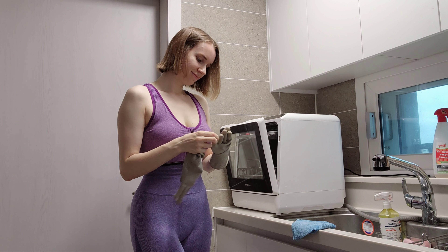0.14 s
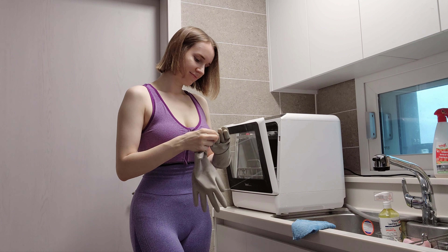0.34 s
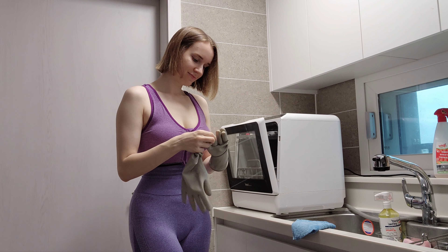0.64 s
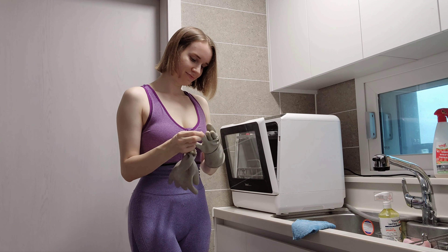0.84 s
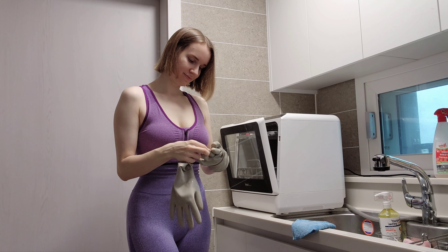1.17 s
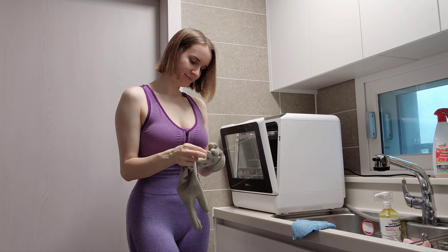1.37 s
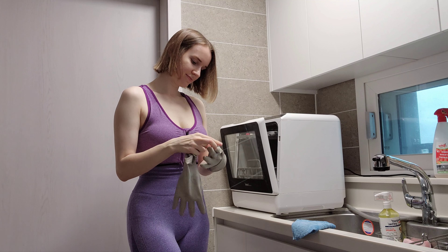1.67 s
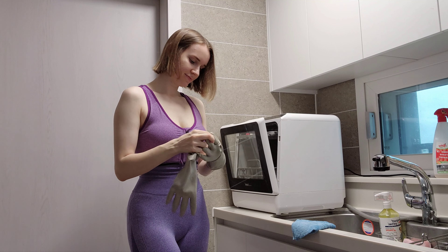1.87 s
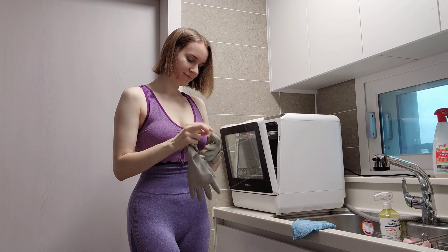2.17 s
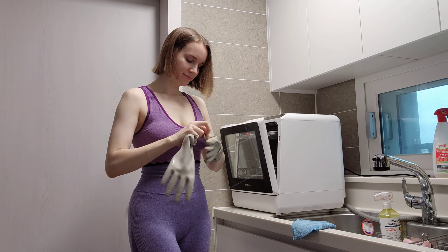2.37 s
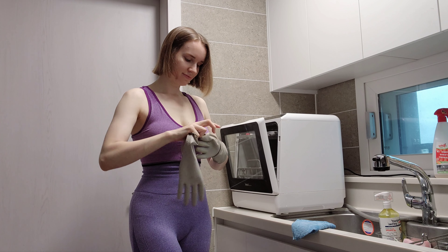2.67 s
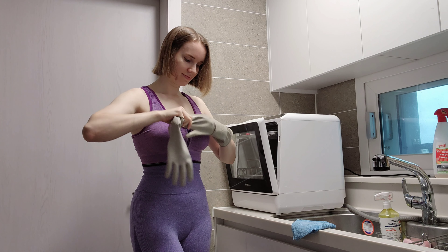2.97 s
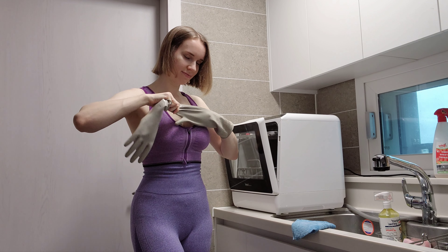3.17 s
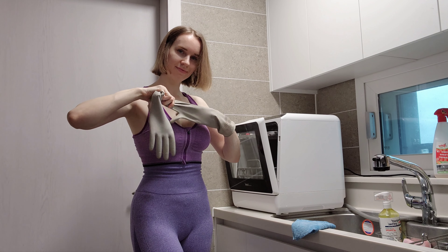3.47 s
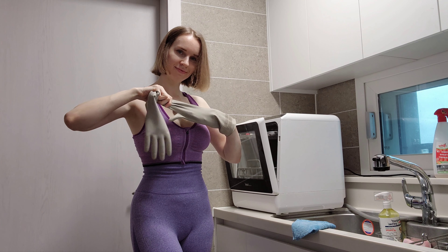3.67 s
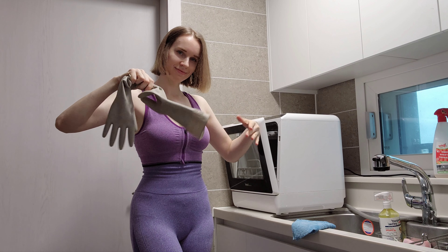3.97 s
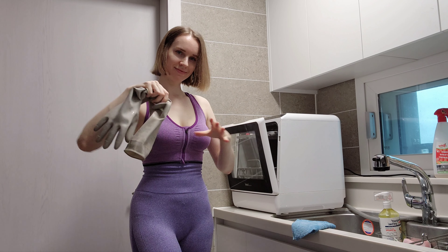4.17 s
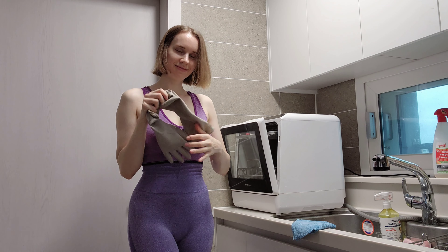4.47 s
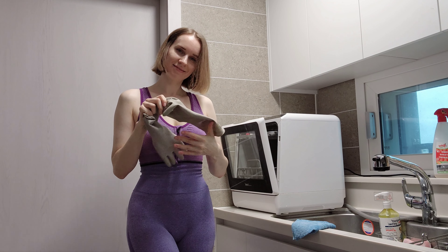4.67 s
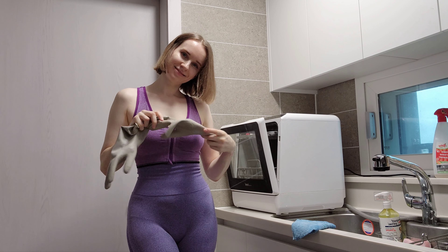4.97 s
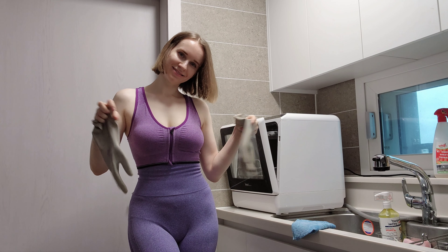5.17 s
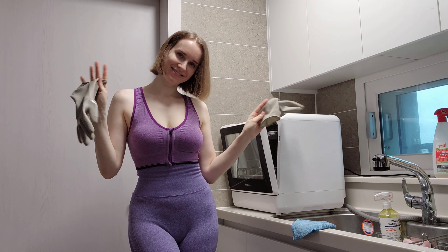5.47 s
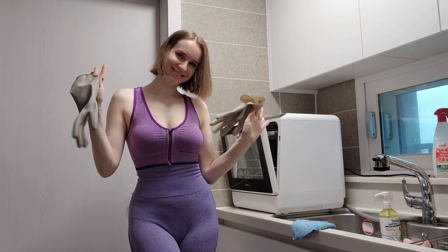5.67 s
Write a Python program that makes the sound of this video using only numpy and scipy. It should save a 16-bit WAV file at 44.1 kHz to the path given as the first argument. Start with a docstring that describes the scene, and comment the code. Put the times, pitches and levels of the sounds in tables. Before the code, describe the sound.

Soft rubbery rustling, quick scrapes and two sharper snaps as gloves come off, then light crackling, above a constant low drone.

```python
"""A low appliance hum holds throughout while someone tugs a rubber glove off finger by finger in a tiled kitchen.
Noise grains rustle with the fingers' effort; from the start, rasps slide off the skin and fingertips flick back.
Then come bright ticks, half-squeaks of rubber on rubber and hollow pops: shaped grains through filters.
From 4.1 s the folds crackle at random; then the limp glove hisses more.
Random taps add a short, bright echo from the hard walls."""
import sys
import numpy as np
from scipy import signal
from scipy.fft import irfft
from scipy.io import wavfile
from scipy.ndimage import uniform_filter1d

SR = 44100
rng = np.random.default_rng(int(sys.argv[2]) if len(sys.argv) > 2 else 0)


def persist_wave(psi):
    """Save psi, clipped to +-1, as 16-bit WAV."""
    counts = np.round(np.clip(psi, -1, 1) * 32767).astype(np.int16)
    wavfile.write(sys.argv[1], SR, np.atleast_2d(counts).T)


N = 257535

# Colour of rubber rubbing on skin. Each row: frequency in Hz, relative level in dB per Hz.
RUBBER_COLOUR = [(100, -46), (200, 7), (400, -2), (650, -6.5), (950, 0), (1250, -3.5), (1600, -8),
                 (2100, -9), (2700, -13.5), (3500, -12.5), (4300, -14.5), (5400, -18), (7800, -22.5),
                 (9000, -31.5), (15500, -35)]
# How hard the fingers work the rubber. Each row: time in seconds, effort in dB.
FINGER_EFFORT = [(0.25, -71), (0.4, -92.5), (0.7, -69), (0.84, -68.5), (1.25, -78.5), (1.46, -68.5),
                 (1.63, -89), (1.9, -61.5), (2.1, -66), (2.3, -75), (2.4, -66.5), (2.65, -66), (2.76, -72),
                 (2.93, -75), (3.08, -90), (3.22, -74.5), (3.55, -69.5), (3.9, -72.5), (4.06, -65.5),
                 (4.2, -66), (4.65, -73.5), (4.86, -70), (5.02, -67), (5.5, -71.5), (5.65, -66),
                 (5.84, -64)]
SCRAPE_DB = 2.0  # rms unevenness: rubber grips and slides by turns
POP_NOOK_SHARE = 0.65  # how much of the nook a pop takes on


def gain_of(db):
    """Decibels to a factor."""
    return 10 ** (np.asarray(db) / 20)


def evened(x):
    """Scales to rms 1."""
    return x / np.sqrt(np.mean(x ** 2) + 1e-30)


def read(points, hz):
    """Reads a table on a log-frequency axis."""
    f, value = np.transpose(points)
    return np.interp(np.log(hz + 1), np.log(f + 1), value)


def add(mix, start_s, sound):
    """Adds a stereo sound at start_s, cut to the length of the mix."""
    start = round(start_s * SR)
    sound = sound[:, max(-start, 0):]
    part = mix[:, max(start, 0):][:, :sound.shape[1]]
    part += sound[:, :part.shape[1]]


def waver(count, size):
    """Smooth chance of rms 1 that changes over about size samples."""
    return evened(signal.oaconvolve(rng.standard_normal(count), signal.windows.hann(size), "same"))


def grains(count, per_s, spread_db, smooth):
    """Stick-slip: tiny clicks of uneven size over smooth friction noise."""
    size = gain_of(spread_db * np.minimum(rng.exponential(1, count), 4))
    sign = rng.choice([-1, 1], count)
    clicks = size * sign * (rng.random(count) < per_s / SR)
    return evened(clicks) + smooth * rng.standard_normal(count)


def coloured(x, curve, size=8192):
    """Causal minimum-phase filter whose gain in dB is curve(Hz), floored at -100 dB."""
    f = abs(np.fft.fftfreq(size, 1 / SR))
    log_gain = np.log(gain_of(np.maximum(curve(f), -100)))
    spectrum = np.exp(np.conj(signal.hilbert(log_gain)))
    taps = np.fft.ifft(spectrum).real[:size // 2]
    return signal.fftconvolve(x, taps)[:len(x)]


def above(f, hz):
    """Smooth step from 0 to 1 around hz."""
    return f ** 4 / (f ** 4 + hz ** 4)


def peak(f, hz, width_hz):
    """Gain in dB of one resonance."""
    return -10 * np.log10(1 + ((f ** 2 - hz ** 2) / ((f + 1) * width_hz)) ** 2)


def resonate(x, hz, width_hz):
    """A steep resonance, two equal poles, that follows the pitch hz."""
    turn = np.exp(2j * np.pi * np.cumsum(hz) / SR)
    r = np.exp(-np.pi * width_hz / SR)
    return (turn * signal.lfilter([(1 - r) ** 2], [1, -2 * r, r * r], x / turn)).real


def nook(f):
    """Gain in dB of the narrow resonances between counter and cupboards."""
    # Each row: frequency in Hz, width in Hz, boost in dB at full share.
    nook_modes = [(435.5, 25, 7.5), (546, 22, 8.5), (623, 19, 10.5), (739, 18, 7.5), (903, 19, 4.5),
                  (1002, 22, 6), (1100, 40, 4), (1299, 67, 11), (1700, 24, 4), (2080, 52, 3)]
    return sum(db / (1 + (2 * (f - hz) / width_hz) ** 2) for hz, width_hz, db in nook_modes)


def kitchen(x, right_db=1.3, wet_db=-2.0, early_db=5.5, early_s=0.013, gap_s=0.0008, mono_hz=380, size=16384):
    """Direct sound, a little earlier on the left, then close reflections and a short tail."""
    # Reverberation. Each row: frequency in Hz, time to fall 60 dB in seconds.
    room_t60 = [(150, 0.61), (500, 0.41), (1000, 0.31), (2000, 0.38), (4000, 0.33), (8000, 0.29),
                (15000, 0.14)]
    taps = rng.choice([-1., 1.], (2, size)) * (rng.random((2, size)) < 0.15)
    hz, frame_s, z = signal.stft(taps, SR, nperseg=256)
    decay = gain_of(-60 * frame_s / read(room_t60, hz)[:, None])
    tail = signal.istft(z * decay, SR, nperseg=256)[1][:, :size]
    t = np.arange(size) / SR
    early = rng.standard_normal((2, size)) * (rng.random((2, size)) < 0.025) * np.exp(-t / early_s)
    echo = gain_of(wet_db) * evened(tail) + gain_of(early_db) * evened(early)
    echo = echo * (t > gap_s) / np.sqrt(size)
    # long waves reach both sides alike
    side = signal.lfilter(*signal.butter(1, mono_hz, "high", fs=SR), echo[1])
    response = np.array([echo[0] + side, echo[0] - side]) / np.sqrt(2)
    response[[0, 1], [0, 2]] += 1  # direct sound: right two samples later
    return signal.fftconvolve(x[None], response, axes=1) * gain_of([[-right_db / 2], [right_db / 2]])


def at_level(x, db, size=400):
    """Scales a sound so that the loudest moment of its mono mean has the level db."""
    return gain_of(db) * x / np.sqrt(uniform_filter1d(x.mean(0) ** 2, size).max())


def steady(curve):
    """Stereo noise with the spectrum curve(Hz), nearly mono in the bass."""
    # Each row: frequency in Hz, left-right likeness from 0 to 1.
    likeness = [(60, 1), (150, 0.97), (300, 0.8), (700, 0.053), (2000, 0.082), (12000, 0.18)]
    f = np.fft.rfftfreq(N, 1 / SR)
    left, other = np.exp(2j * np.pi * rng.random((2, len(f))))
    same = np.clip(read(likeness, f), -1, 1)
    right = same * left + np.sqrt(1 - same ** 2) * other
    return evened(irfft(np.array([left, right]) * gain_of(curve(f)), N))


def hum():
    """A low drone of even strength whose close tones beat, with faint wavering whines and moving air."""
    drone_db, air_db = -45.0, -57.5
    # Appliance drone. Each row: frequency in Hz, relative level in dB per Hz.
    drone_curve = [(15, -38), (38, -24.5), (47, -7), (56, -3), (63, -4), (72, 9), (81, 0.5), (90, 9),
                   (98, -5), (108, 7.5), (118, -13.5), (145, -40.5), (250, -61.5), (600, -110)]
    # Moving air in the room. Each row: frequency in Hz, relative level in dB per Hz.
    air_curve = [(60, -10), (130, 0), (220, -5.5), (300, -14), (400, -26), (600, -30), (900, -26),
                 (1300, -36), (2000, -42), (3200, -45), (5000, -53), (7500, -56), (9500, -64), (15500, -62)]
    # Faint tones. Each row: frequency in Hz, width in Hz of one of two equal stages, level in dB.
    whine_bands = [(226, 24, -73), (880, 98, -81), (6450, 70, -95.5)]
    drone = steady(lambda f: read(drone_curve, f))
    drone = drone / np.sqrt(uniform_filter1d(drone[0] ** 2, size=9000))
    air = steady(lambda f: read(air_curve, f))
    whines = sum(gain_of(db) * steady(lambda f: 2 * peak(f, hz, width_hz))
                 for hz, width_hz, db in whine_bands)
    return gain_of(drone_db) * drone + gain_of(air_db) * air + whines


def creases(flurry_db=3, count=10):
    """Creases of many sizes: each rubs softly in its own band and in its own little flurries."""
    edges_hz, out = np.geomspace(350, 15500, count + 1), 0
    for band in zip(edges_hz, edges_hz[1:]):
        flurries = gain_of(flurry_db * np.clip(waver(N, size=3000), -2, 1.7))
        crinkles = grains(N, 500, 1.6, 0.7) * flurries
        out = out + signal.sosfilt(signal.butter(2, band, "band", fs=SR, output="sos"), crinkles)
    return out


def rustle(bright_db=6, rub_hz=1050, rub_width_hz=850, nook_share=0.16):
    """Soft, grainy rubbing that follows the fingers' effort: a dull, hollow part and a dry hiss."""
    rub_db, hiss_db = -3, -6  # relative to the effort
    # once off the hand, the limp rubber brushes itself and hisses more
    loose_s, loose_rise_s, loose_hiss_db = 4.57, 2.2, 7.5
    t, friction = np.arange(N) / SR, creases()
    effort_db = np.interp(t, *np.transpose(FINGER_EFFORT))
    loose = np.clip((t - loose_s) / loose_rise_s, 0, 1)
    dull = coloured(friction, lambda f: peak(f, rub_hz, rub_width_hz) + nook_share * nook(f)
                    - 20 * above(f, 5700))
    dry_hiss = coloured(friction, lambda f: read(RUBBER_COLOUR, f) - 25 * (1 - above(f, 1120))
                        + bright_db * above(f, 12000))
    scrapes_db = SCRAPE_DB * (loose > 0) * waver(N, size=1200)
    hiss_gain = gain_of(hiss_db + loose_hiss_db * loose + scrapes_db)
    sound = gain_of(effort_db) * (gain_of(rub_db) * evened(dull) + hiss_gain * evened(dry_hiss))
    return evened(kitchen(sound)[:, :N]) * sound.std()


def slip(peak_s, db, swell_s, fade_s, thump_db, sizzle_db, top_db, right_db=1.0, count=20000):
    """A patch of rubber lets go: crinkles and friction swell to a peak and die away in uneven scrapes."""
    thump_hz, sizzle_hz, top_hz = 850, 2570, 8500  # thump below, sizzle above, air above
    t = np.arange(count) / SR - 0.2
    crinkles = grains(count, 1100, 2.5, 0.45) * gain_of(SCRAPE_DB * waver(count, size=600))
    rasp = crinkles * np.exp(np.where(t < 0, -(t / swell_s) ** 2, -t / fade_s))
    sound = coloured(rasp, lambda f: read(RUBBER_COLOUR, f) + nook(f)
                     + thump_db * (1 - above(f, thump_hz))
                     + sizzle_db * above(f, sizzle_hz)
                     + top_db * above(f, top_hz))
    return peak_s + t[0], at_level(kitchen(sound, right_db), db)


def flick(s, db, hz, rise_s, fade_s, crack_db, right_db, sag=0.18, sag_s=0.045, flutter_db=2, crack_s=0.007,
          count=8000):
    """A taut fingertip springs back: a soft crack, then fluttering modes that sink as the rubber slackens."""
    # Each row: share of the highest pitch, width as a share of it, level in dB.
    modes = [(0.63, 0.36, -8), (0.78, 0.092, -1), (0.91, 0.11, 0), (1.0, 0.052, -6.5)]
    t = np.arange(count) / SR
    rise = (1 - np.exp(-t / rise_s)) ** 2
    push = grains(count, 1500, 5.1, 1.0) * gain_of(flutter_db * waver(count, size=300)) * rise
    pitch = hz * (1 - sag * (1 - np.exp(-t / sag_s)) + 0.011 * waver(count, size=500))
    fading = push * np.exp(-t / fade_s)
    ring = sum(gain_of(mode_db) * evened(resonate(fading, share * pitch, width * hz))
               for share, width, mode_db in modes)
    crack = coloured(push * np.exp(-t / crack_s), lambda f: read(RUBBER_COLOUR, f)
                     - 8 * (1 - above(f, 700)) - 5 * above(f, 2500) - 6 * above(f, 7000))
    sound = evened(ring) + gain_of(crack_db) * evened(crack)
    return s - rise_s, at_level(kitchen(sound, right_db), db)


def tick(s, db, hz, width_share, fade_s, early_db, count=4000):
    """Tacky rubber lets go: a very short, bright snap of noise through one resonance."""
    u = np.arange(count) / SR / fade_s
    snap = rng.standard_normal(count) * u * np.exp(-u)
    sound = coloured(snap, lambda f: peak(f, hz, width_share * hz))
    return s - fade_s, at_level(kitchen(sound, early_db=early_db), db)


def rub(peak_s, db, hz, width_share, swell_s, fade_s, right_db, glide_per_s=-0.9, scrape_db=-13,
        nook_share=0.33, count=14000):
    """Friction swells and fades in one pocket of the glove, whose pitch slides as it changes shape."""
    t = np.arange(count) / SR - 0.12
    drag = grains(count, 830, 3.3, 0.68) * np.exp(np.where(t < 0, t / swell_s, -t / fade_s))
    pitch = hz * (1 + glide_per_s * t)
    note = coloured(resonate(drag, pitch, width_share * hz), lambda f: nook_share * nook(f))
    scrape = coloured(drag, lambda f: read(RUBBER_COLOUR, f))
    sound = evened(note) + gain_of(scrape_db) * evened(scrape)
    return peak_s + t[0], at_level(kitchen(sound, right_db), db)


def pop(s, db, hz, width_share, fade_s, crack_db, right_db, rise_s=0.002018, count=8000):
    """A fold flips over: a crack from the sheet and a damped, unsteady note from the pocket of air."""
    t = np.arange(count) / SR
    envelope = np.exp(-t / fade_s) * (1 - np.exp(-t / rise_s)) ** 2
    push = grains(count, 2000, 0.63, 0.89) * envelope
    pitch = hz * (1 + 0.039 * width_share * waver(count, size=400))
    note = coloured(resonate(push, pitch, width_share * hz),
                    lambda f: POP_NOOK_SHARE * nook(f) - 20 * (1 - above(f, 196)))
    crack = coloured(push, lambda f: read(RUBBER_COLOUR, f) + POP_NOOK_SHARE * nook(f)
                     - 7 * above(f, 6000))
    sound = evened(note) + gain_of(crack_db) * evened(crack)
    return s - rise_s, at_level(kitchen(sound, right_db), db)


def crumple(fade_s=0.003, width_share=0.16, count=800):
    """The folds of the emptying glove give way at random in tiny crackles, each size at its own pitch."""
    from_s, level_db, per_s = 4.1, -2.5, 11  # start, level against the effort, rate of each fold
    # Pitch of each fold in Hz, large to small.
    folds_hz = [1300, 2130, 3160, 5000]
    t = np.arange(N) / SR
    burst, out = np.exp(-np.arange(count) / SR / fade_s), 0
    for hz in folds_hz:
        gives = rng.uniform(0.3, 1, N) * (rng.random(N) < per_s / SR)
        crackle = signal.oaconvolve(gives, burst)[:N] * rng.standard_normal(N)
        fold = coloured(crackle, lambda f: peak(f, hz, width_share * hz) - 16 * above(f, 8000))
        out = out + evened(fold)
    effort_db = np.interp(t, *np.transpose(FINGER_EFFORT))
    return evened(kitchen(out)[:, :N]) * gain_of(effort_db + level_db) * (t > from_s)


def scene():
    """The glove over the hum."""
    # Rubber sliding off the skin. Each row: peak time in seconds, level in dB, swell and fade in seconds,
    # low thump, high sizzle and topmost air in dB.
    slips = [(0.006, -47.5, 0.075, .02, -24.5, -1, 2), (0.227, -75.5, 0.031, 0.018, -14, 26, -2),
             (0.333, -67, 0.027, 0.038, 0, 11, -4), (0.717, -62, 0.0066, 0.046, -1, 8.5, -5),
             (0.753, -50, 0.013, 0.021, -2.5, 4.5, 3), (0.776, -53.5, 0.006, .011, -12, 14.5, -2),
             (0.80, -53.5, 0.0065, 0.018, -19, 3.5, -10), (1.32, -52, 0.0051, .012, -4.5, 10, 4),
             (1.332, -46.5, 0.0079, 0.02, -4.5, 8.5, -0.5), (1.39, -65, .02, 0.057, -14, 14, -18),
             (1.955, -36, 0.01, 0.014, -4.5, -1, 3.5), (1.995, -47, 0.048, 0.0056, -13, -4, -3),
             (2.353, -56.5, 0.016, 0.0088, -7, -2, 7), (2.58, -55, 0.024, .033, -19, 1.5, -2),
             (2.61, -57, 0.0089, 0.013, -2, -2, -1), (2.671, -57.5, .03, 0.017, -42, -3, -14),
             (2.823, -63.5, 0.046, 0.05, 8.5, 8, -7), (2.984, -61, 0.023, 0.075, -0.5, 7.5, 0),
             (3.023, -53, 0.0057, 0.021, -1, -3, 10), (3.445, -54, 0.0061, 0.013, 1, -1.5, 8.5),
             (3.762, -45, 0.0035, 0.026, -14, -1, -7), (3.79, -43, 0.007, 0.015, -14, 7.5, 6.5),
             (3.81, -39, 0.014, .024, -5.5, 7, -0.5), (3.85, -43, 0.05, 0.029, 0.5, -13, 7),
             (4.113, -62, .011, .014, -2, 8, -5), (4.131, -60.5, .008, 0.0066, 2, 9, -10),
             (4.201, -54, 0.028, 0.028, 5.5, 6, -17), (4.329, -58.5, .008, 0.026, 3, 6, -28),
             (4.464, -58.5, 0.0054, .012, 1, 1.5, 11), (4.481, -54, 0.008, 0.021, -2, 5.5, 7),
             (4.526, -55.5, 0.0045, 0.36, 24, 23.5, -3), (4.745, -65, 0.1, .16, 5, -2, 11),
             (4.933, -51, 0.022, 0.042, -6.5, 5.5, 0), (5.161, -59.5, 0.014, 0.025, -14, 4, 4),
             (5.193, -57.5, 0.019, 0.014, 11, 13, 0), (5.326, -61, 0.078, 0.058, 11.5, 22, 2),
             (5.652, -57.5, 0.019, 0.0093, 7, 16, -18), (5.804, -56.5, 0.076, 0.072, 21, -13, -4)]
    # Stretched fingertips flicking back. Each row: time in seconds, level in dB, highest pitch in Hz,
    # rise and fade in seconds, crack in dB, right minus left in dB.
    flicks = [(0.122, -55, 2150, .004, 0.016, -3.5, 0.5), (0.998, -54.5, 1916, 0.0022, 0.033, -1.5, 1.5),
              (1.543, -43, 2212, 0.0018, 0.016, -9.5, 1), (2.178, -53, 2006, 0.0043, 0.038, -2, 2),
              (4.606, -61, 2246, 0.0046, 0.023, -10, 3), (5.761, -51, 2300, .003, 0.0066, 1.5, -1)]
    # Tacky rubber letting go. Each row: time in seconds, level in dB, centre in Hz, width as a share of it,
    # fade in seconds, close reflections in dB.
    ticks = [(0.714, -82, 3320, .15, 0.0014, 4), (0.928, -69.5, 5140, 0.11, 0.0048, -7),
             (1.006, -74, 4500, 0.052, 0.0044, 8), (1.274, -61, 5200, 0.21, 0.0025, -15),
             (1.544, -54, 3700, 0.18, .0012, -24), (3.303, -70.5, 6300, 0.24, .0015, 7),
             (4.13, -74, 3480, 0.11, 0.0012, 6), (4.399, -68, 3650, 0.24, 0.0016, -2),
             (4.527, -67, 4940, 0.085, 0.0014, 2), (4.928, -64, 9500, 0.33, 0.0016, 1),
             (4.938, -56, 2800, 0.18, 0.0017, 6), (5.058, -66.5, 5500, 0.32, 0.0035, -7),
             (5.349, -73, 9000, 0.91, 0.00037, 10), (5.633, -53, 5300, 0.92, 0.00034, -9),
             (5.713, -59.5, 5240, 0.18, .001, 3), (5.832, -69, 5530, 0.43, .0006, -6)]
    # Rubber dragging on rubber. Each row: peak time in seconds, level in dB, pitch in Hz at the peak,
    # width as a share of it, swell and fade in seconds, right minus left in dB.
    rubs = [(1.291, -64.5, 1160, 0.3, 0.0092, 0.011, 5), (1.45, -68, 2000, 0.37, 0.0084, .02, 3),
            (1.538, -51.5, 947, 0.083, 0.013, 0.004, 4.5), (1.861, -75, 1370, 0.096, 0.013, 0.009, 6),
            (1.897, -65, 1280, 0.089, 0.0091, 0.026, 13), (2.398, -62.5, 1280, 0.11, 0.0044, 0.022, 8),
            (2.435, -71, 1250, 0.28, .008, 0.049, 7), (2.637, -58, 1290, 0.1, 0.005, 0.016, 4),
            (2.672, -49.5, 1353, 0.068, 0.013, 0.0032, 2), (2.784, -68.5, 1090, 0.14, 0.017, .012, 7),
            (2.83, -64.5, 878, 0.064, 0.025, 0.014, -4), (3.391, -69, 1050, 0.28, 0.0091, 0.017, 5),
            (3.697, -62, 970, 0.41, 0.058, 0.067, 1), (4.482, -54.5, 1080, 0.61, 0.016, 0.0066, -1),
            (4.57, -64, 380, 0.84, 0.045, 0.041, 1), (4.729, -69, 340, 0.48, 0.049, .05, -1),
            (4.744, -63.5, 850, 0.45, 0.017, .015, -6), (4.903, -61.5, 1120, 0.51, 0.016, 0.036, 1.5),
            (5.019, -59, 1360, 0.96, 0.02, 0.018, 0), (5.066, -65.5, 1380, 0.27, 0.017, 0.0089, 5),
            (5.169, -62, 2260, 0.19, 0.0063, 0.024, -1), (5.184, -56, 1000, 0.17, 0.014, 0.0031, 1),
            (5.23, -65, 316, 0.38, .04, 0.061, 3), (5.342, -68, 820, 0.95, 0.011, 0.0068, 2)]
    # The hollow glove buckling. Each row: time in seconds, level in dB, pitch of the air inside in Hz,
    # width as a share of it, fade in seconds, crack of the sheet in dB, right minus left in dB.
    pops = [(1.329, -50, 1150, 0.29, 0.0092, -2, -1), (1.522, -55.5, 950, 0.12, 0.011, 3, 2.5),
            (1.95, -37, 1250, 0.35, 0.0044, -6, 6), (3.017, -48.5, 920, 0.21, 0.0035, 3, 1),
            (3.032, -48, 1020, 0.91, 0.021, -17, -.5), (3.297, -50, 940, 0.43, 0.015, -3.5, 3),
            (3.588, -58, 1230, 0.58, 0.017, -7, 6), (3.799, -37.5, 935, 0.24, 0.026, -14, 3),
            (3.833, -38, 930, 0.54, 0.0062, -10, -2), (3.857, -41.5, 1090, 0.46, 0.011, -26, -2.5),
            (3.891, -52, 1000, 0.76, 0.011, -18, -1), (4.177, -53, 980, 0.19, 0.0089, -10, 4),
            (4.196, -54.5, 995, .3, .007, 1, -3), (4.277, -50, 1040, 0.51, 0.019, -24, 3.5),
            (4.342, -62, 700, 0.9, 0.0052, -3, -10), (4.522, -54.5, 1400, 0.46, .01, -13, 5),
            (4.556, -56.5, 860, 0.38, 0.0096, -1, -1), (5.653, -54.5, 1100, 0.22, 0.0053, -2.5, 4),
            (5.764, -56, 1090, 0.23, 0.01, -16, 7)]
    mix = hum() + rustle() + crumple()
    for source, table in ((slip, slips), (flick, flicks), (tick, ticks), (rub, rubs), (pop, pops)):
        for row in table:
            add(mix, *source(*row))
    return mix


def record(dry):
    """Band limit: a steep low-pass."""
    edge_hz = 15900
    taps = signal.firwin(511, edge_hz, window=("kaiser", 9), fs=SR)
    return signal.oaconvolve(dry, taps[None], "same")


dry = scene()
out = record(dry)
persist_wave(out)
```